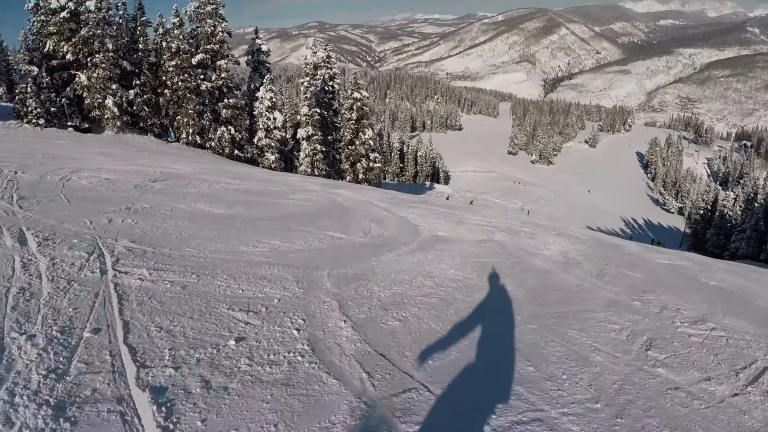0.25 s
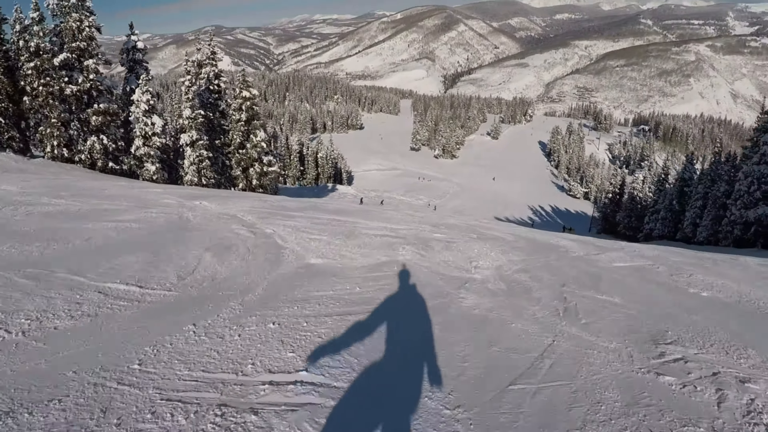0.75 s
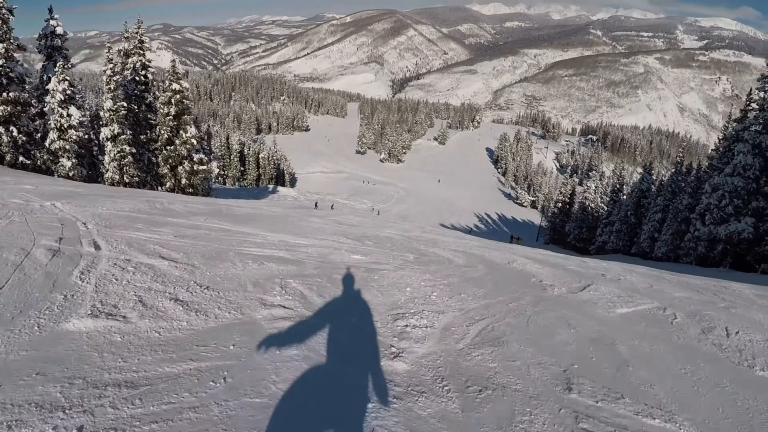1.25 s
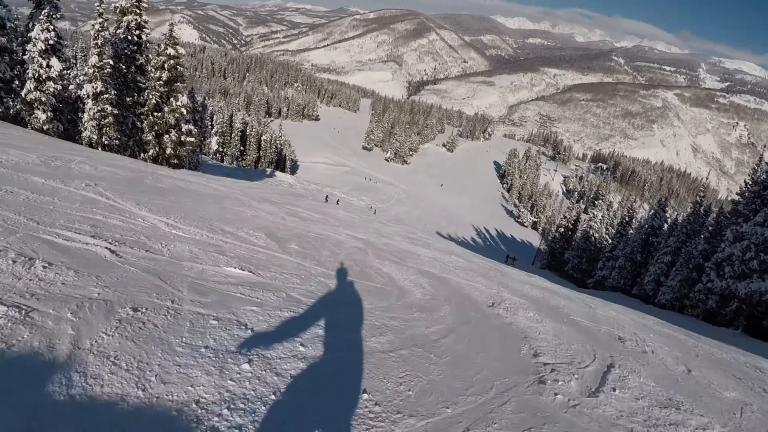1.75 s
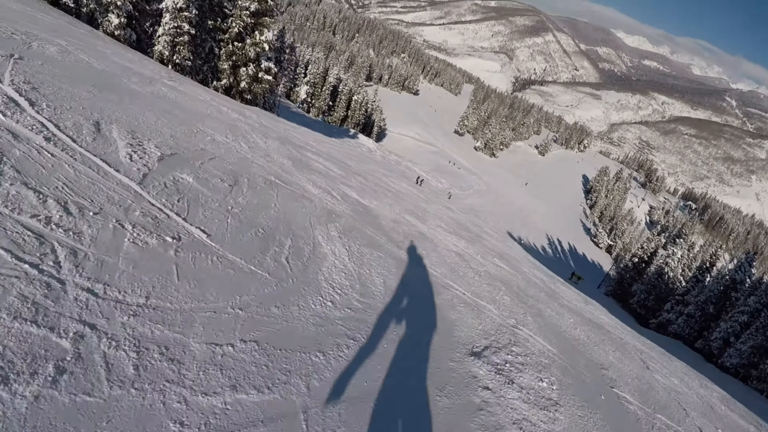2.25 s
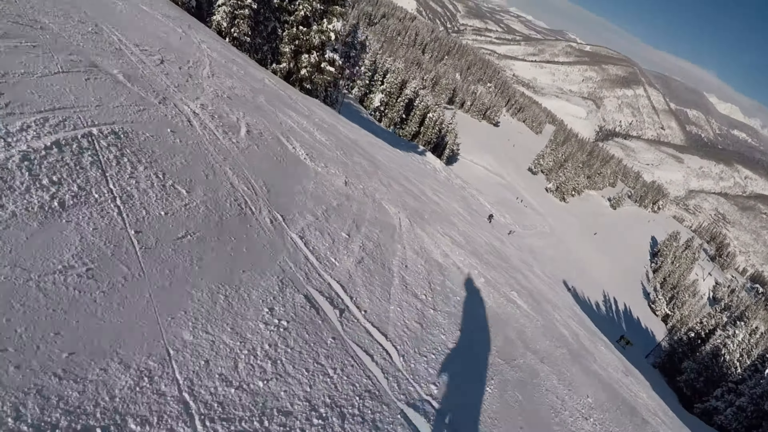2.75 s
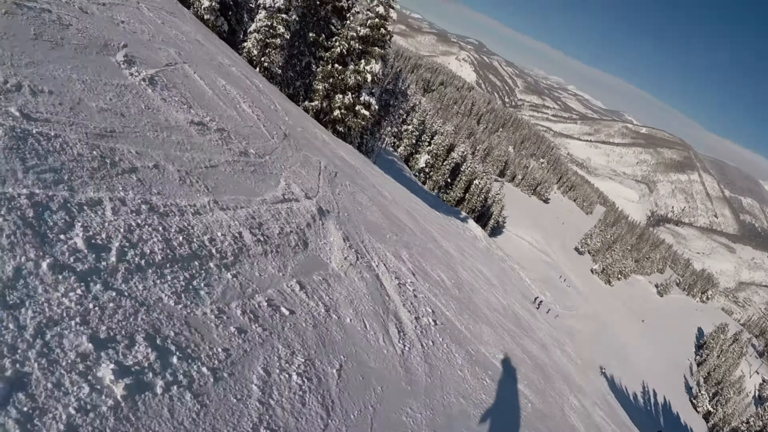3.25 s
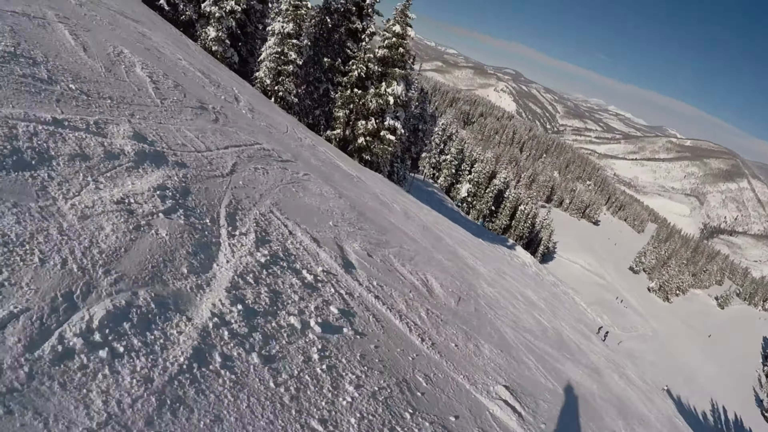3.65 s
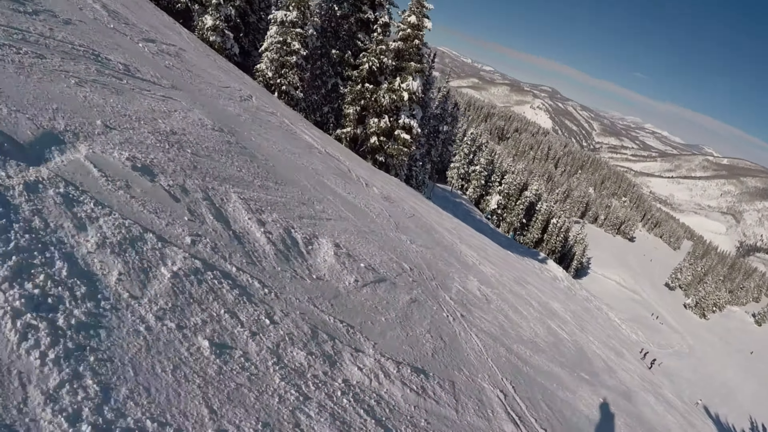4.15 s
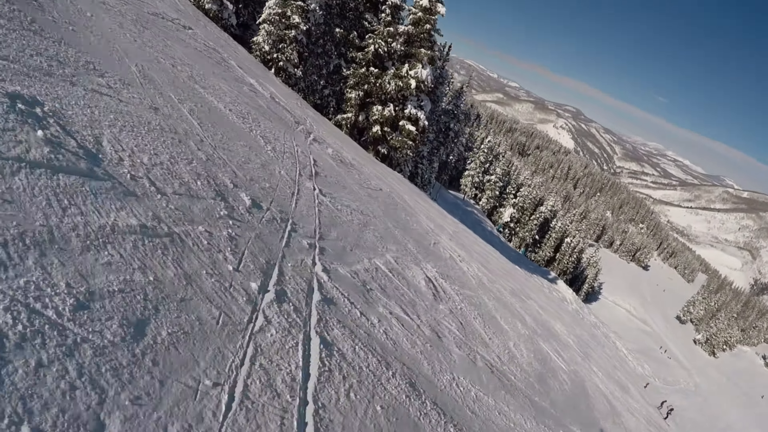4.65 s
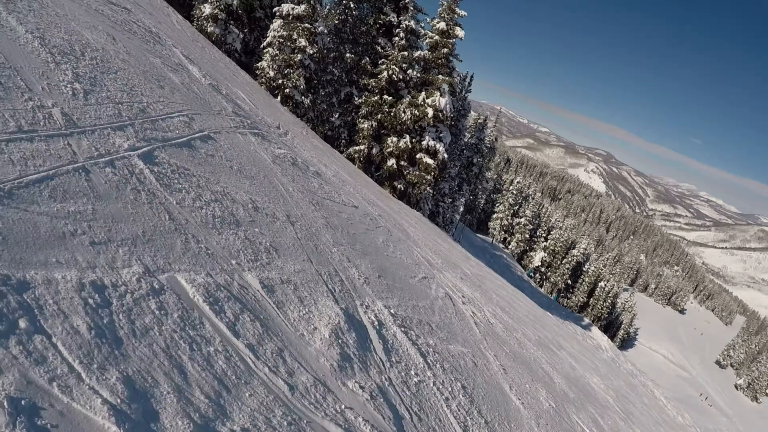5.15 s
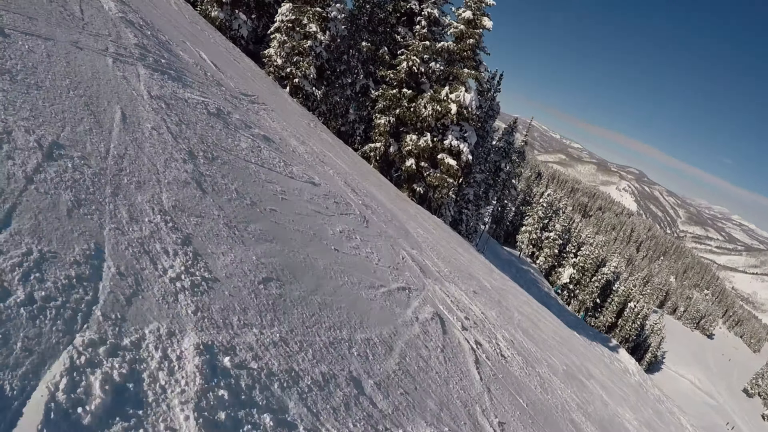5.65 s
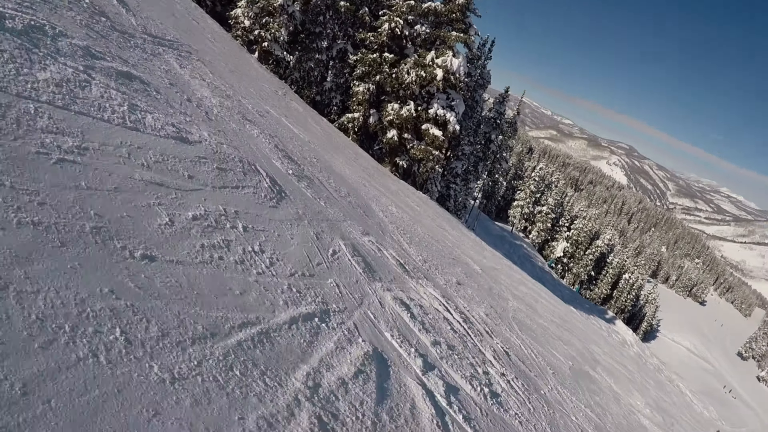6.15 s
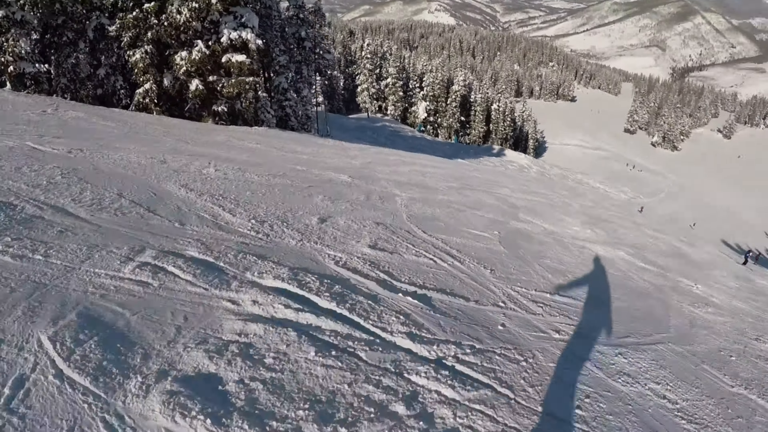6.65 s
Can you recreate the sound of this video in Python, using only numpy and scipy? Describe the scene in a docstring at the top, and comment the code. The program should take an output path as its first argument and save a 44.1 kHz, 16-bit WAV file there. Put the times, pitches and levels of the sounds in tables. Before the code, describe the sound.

Close on a snowboarder outdoors, a board scrapes and grinds over firm choppy snow. Wind gusts briefly, then a rough crunchy edge carve builds, eases to near quiet at about two seconds, and returns with heavy rut drumming and thuds. After four seconds it becomes a harsh, hissing skid with low booms, fading near the end. Low wind rumble continues. The snow sounds start wide, narrow nearly to mono, then widen again.

```python
"""On a slope of firm, chopped-up snow, a snowboard links turns, heard from a camera on the rider.
Wind noise is slow and fast pressure swings; loose snow patters as tiny random clicks.
Lumps knock, thud and crack as short noise bursts, and the loaded board booms at changing pitches.
Noise shaped by the load makes the ruts drum, the base grind and the edge scrape and hiss.
The snow sounds start wide, close almost to mono for the middle of the run, then open again."""
import sys
import numpy as np
from scipy import signal
from scipy.fft import rfft, irfft, next_fast_len
from scipy.io import wavfile
from scipy.ndimage import uniform_filter1d, map_coordinates

SR = 44100
rng = np.random.default_rng(int(sys.argv[2]) if len(sys.argv) > 2 else 0)


def generate_wav(sig):
    """Save sig (samples, or channels by samples) to the path in sys.argv[1] as 16-bit PCM at SR."""
    pcm = np.round(np.clip(np.atleast_2d(sig).T, -1, 1) * 32767).astype(np.int16)
    wavfile.write(sys.argv[1], SR, pcm)


N = 305172  # length in samples


def amp(db):
    """Turn decibels into gain."""
    return 10 ** (np.asarray(db) / 20)


def unit(x):
    """Scale to an rms of 1."""
    return x / np.sqrt(np.mean(x ** 2) + 1e-20)


def in_db(gains):
    """Joint level of unrelated sounds: their powers add."""
    return 10 * np.log10(sum(g ** 2 for g in gains) + 1e-20)


def along(points, hz):
    """Read (frequency [Hz], value) points on a log frequency axis."""
    f, v = np.transpose(points)
    return np.interp(np.log(hz + 1), np.log(f + 1), v)


def curves(rows):
    """Give one value per sample for each column after the time."""
    s, *columns = np.transpose(rows)
    return [np.interp(np.arange(N) / SR, s, column) for column in columns]


def ramp(middle, length):
    """Move steadily from 0 to 1 around a moment; both arguments are in seconds."""
    return np.clip((np.arange(N) / SR - middle) / length + .5, 0, 1)


def swell(start, held, attack, release):
    """Rise, hold and fall as a gain; attack and release are seconds per 20 dB."""
    t = np.arange(N) / SR - start
    rise = np.minimum(t, 0) / attack
    fall = np.maximum(t - held, 0) / release
    return amp(20 * (rise - fall))


def wobble(rate):
    """A smooth random curve at rms 1, made from rate random points a second."""
    points = rng.standard_normal(int(N * rate / SR) + 4)
    return unit(map_coordinates(points, [np.arange(N) * rate / SR]))


def filtered(x, response):
    """Multiply the spectrum of x by a response of frequency."""
    m = next_fast_len(N + SR // 4)
    return irfft(rfft(x, m) * response(np.fft.rfftfreq(m, 1 / SR)), m)[..., :N]


# resonances shared by all the coloured noises: (frequency [Hz], width [Hz], lift [dB])
RESONANCES = [(247, 68, 0.5), (497, 84, 1.5), (644.5, 71, 7.5), (753, 83, 2), (935, 160, 2),
              (1183, 120, 3.5), (1444, 210, 2), (2080, 130, 1), (2435, 120, 3), (3950, 640, 2.5),
              (4500, 250, 2)]


def coloured(x, spectrum):
    """Give x a spectrum plus the shared resonances, then scale it to rms 1."""
    def response(hz):
        lift = sum(db / (1 + (2 * (hz - centre) / width) ** 2) for centre, width, db in RESONANCES)
        return amp(along(spectrum, hz) + lift)
    return unit(filtered(x, response))


def blend(force, first, second, share):
    """Fade one force from a first to a second colour; the squared gains add up to 1."""
    share = np.clip(share, 0, 1)
    return np.sqrt(1 - share) * coloured(force, first) + np.sqrt(share) * coloured(force, second)


def fractures(rate, scatter_db, smooth):
    """Two streams of tiny breaks of random size, rate a second, over smooth sliding friction."""
    breaks = (rng.random((2, N)) < rate / SR) * rng.choice([-1, 1], (2, N))
    sizes = amp(scatter_db * np.clip(rng.standard_normal((2, N)), -2, 2))
    return unit(unit(breaks * sizes) + smooth * rng.standard_normal((2, N)))


# air pressing on the camera: (time [s], slow swell level [dB], flutter level before its wobble [dB])
AIR_PRESSURE = [(0, -51, -48.5), (.5, -53.5, -48.5), (1.6, -53.5, -54), (2.15, -56, -59), (2.6, -47, -55),
                (3.0, -49, -67), (3.3, -42.5, -50.5), (3.55, -50.5, -58), (3.75, -49.5, -57.5),
                (4.1, -52.5, -58), (4.48, -44, -54), (4.8, -55, -51), (5.25, -55, -67), (5.48, -58, -59),
                (5.68, -45.5, -71.5), (5.85, -54, -59.5), (6.08, -47.5, -56), (6.35, -58, -57.5),
                (6.92, -58.5, -54.5)]
# wind whirling across the microphone ports: (time [s], held [s], level before its wobble [dB])
GUSTS = [(0, 0.082, -48), (4.7, 2.2, -59), (6.08, 0.53, -49.5), (6.7, 0.22, -60)]
# wind howling in the housing: (time [s], held [s], level before its wobble [dB])
HOWLS = [(0.12, 0.25, -56), (6.3, 0.2, -64)]
GUST_ATTACK_S, GUST_RELEASE_S = 0.33, 0.42  # time to rise or fall by 20 dB
# colour of the slow swell: (frequency [Hz], relative level [dB])
RUMBLE_COLOUR = [(8, -5.5), (22, 4.5), (42, -0.5), (62, -10), (100, -27), (300, -72.5)]
# colour of the faster flutter: (frequency [Hz], relative level [dB])
FLUTTER_COLOUR = [(35, -9.5), (65, -3), (90, -1), (135, -1), (175, -7), (260, -15), (700, -70.5)]
# colour of the small eddies at the ports: (frequency [Hz], relative level [dB])
EDDY_COLOUR = [(20, 5), (100, 3.5), (300, 4), (560, 2), (900, -1), (1200, -10), (2000, -23.5), (4000, -51),
               (9000, -61)]
# colour of the howl: (frequency [Hz], relative level [dB])
HOWL_COLOUR = [(400, -26), (700, -7.5), (980, 0), (1250, -14), (2000, -23), (5000, -59)]


def wind():
    """Pressure swings reach both ports alike; eddies and howl push them against each other: (mid, side)."""
    swell_db, flutter_db = curves(AIR_PRESSURE)
    rumble = coloured(rng.standard_normal(N), RUMBLE_COLOUR) * amp(swell_db)
    flutter = coloured(rng.standard_normal(N), FLUTTER_COLOUR) * amp(flutter_db + 1.4 * wobble(7.1))
    gusts = [amp(db) * swell(s, held, GUST_ATTACK_S, GUST_RELEASE_S) for s, held, db in GUSTS]
    eddies = coloured(rng.standard_normal(N), EDDY_COLOUR) * amp(in_db(gusts))
    howls = [amp(db) * swell(s, held, GUST_ATTACK_S, GUST_RELEASE_S) for s, held, db in HOWLS]
    howl = coloured(rng.standard_normal(N), HOWL_COLOUR) * amp(in_db(howls))
    return np.array([rumble + flutter, (eddies + howl) * amp(1.9 * wobble(35))])


FULL_SCRAPE_DB = -50  # scrape level that counts as a full scrape
SPRAY_DB, SPRAY_GROWS = -92, 0.19  # patter level under a full scrape; dB of patter per dB of scrape
# the edge throws up loose snow: (time [s], held [s], level [dB])
THROWS = [(1.38, .1, -97), (3.11, 0.16, -87), (4.05, .04, -89), (4.25, .25, -91), (4.62, 0.078, -85),
          (5.03, 0.18, -93), (5.72, 0.21, -93)]
THROW_ATTACK_S, THROW_RELEASE_S = .2, .15  # time to rise or fall by 20 dB
# colour of the falling crystals: (frequency [Hz], relative level [dB])
POWDER_COLOUR = [(6000, -21), (8500, 6.5), (10500, 0), (12800, -2.5), (15000, -12.5)]


def spray(scrape_db):
    """Loose crystals patter louder the harder the edge scrapes, and in thrown sheets: (mid, side)."""
    patter = amp(SPRAY_DB + SPRAY_GROWS * (scrape_db - FULL_SCRAPE_DB))
    sheets = [amp(db) * swell(s, held, THROW_ATTACK_S, THROW_RELEASE_S) for s, held, db in THROWS]
    crystals = coloured(fractures(rate=1500, scatter_db=2.5, smooth=1.2), POWDER_COLOUR)
    return crystals * amp(in_db([patter] + sheets))


# lumps under the board, levels before the soft start and the doubling of knock and crack:
# (time [s], knock level [dB], thud level [dB], crack level [dB])
LUMPS = [(0.374, -48.5, -57, -65), (0.723, -51, -47, -49), (.761, -54, -45, -46.5), (.884, -57, -37, -62),
         (1.274, -54, -58, -51), (1.324, -52, -61, -47), (1.361, -52, -55, -55), (1.724, -55, -57, -64),
         (1.75, -61, -58, -52), (1.94, -48, -52, -61), (1.96, -49, -60, -71), (2.016, -50, -67, -52.5),
         (2.291, -75, -46, -75), (2.367, -48.5, -61, -68), (2.389, -52, -63, -71), (2.529, -53, -60, -58),
         (2.603, -66, -44, -76), (2.655, -54, -47, -63), (2.775, -52, -55, -76), (2.937, -55, -35, -56),
         (3.4, -54, -46, -67), (3.43, -47, -46, -67), (3.894, -47, -61, -76), (3.933, -58, -48, -62),
         (4.164, -56, -48, -53), (4.249, -43, -39, -63), (4.487, -53, -33, -55), (4.578, -50, -55, -51),
         (4.845, -59, -30.5, -62), (4.924, -61, -32, -56), (5.582, -60, -48, -63), (5.611, -54, -37, -55),
         (5.859, -50, -47, -51), (6.267, -47, -42.5, -55.5), (6.391, -52, -45, -69), (6.851, -52, -50, -65),
         (6.909, -51, -61, -57)]
KNOCK_ATTACK_S, THUD_ATTACK_S, CRACK_ATTACK_S = .0015, 0.0026, .0007  # time constants of the rise
# colour of a knock on the base: (frequency [Hz], relative level [dB])
KNOCK_COLOUR = [(150, -26), (600, 23), (1300, 7), (2200, -1), (3200, -14), (4500, -10), (6500, -13),
                (9000, -34), (15000, -52)]
# colour of the deck in thuds, and in drumming off the first edge: (frequency [Hz], relative level [dB])
DECK_OTHER = [(80, -26.5), (120, -7.5), (170, 1.5), (210, 0.5), (260, 3.5), (340, -0.5), (450, -9.5),
              (620, -17.5), (1200, -81)]
# colour of a lump cracking apart: (frequency [Hz], relative level [dB])
CRACK_COLOUR = [(400, -22), (1200, 3.5), (2200, 6), (3200, 5), (4400, 4.5), (6000, -14), (8000, -40),
                (14000, -46)]


def lumps(knock_t60=0.021, thud_t60=0.084, crack_t60=0.016):
    """Lumps knock on the base, thump the deck and crack; each t60 is seconds to fall 60 dB: (mid, side)."""
    knock, thud, crack = np.zeros((3, N + SR))
    t = np.arange(SR // 4) / SR

    def burst(db, t60, attack):
        return amp(db - 60 * t / t60) * (1 - np.exp(-t / attack))

    for s, knock_db, thud_db, crack_db in LUMPS:
        start = round(s * SR)
        knock[start:][:len(t)] += burst(knock_db, knock_t60, KNOCK_ATTACK_S)
        thud[start:][:len(t)] += burst(thud_db, thud_t60, THUD_ATTACK_S)
        crack[start:][:len(t)] += burst(crack_db, crack_t60, CRACK_ATTACK_S)
    force = rng.standard_normal((2, N))
    return (2 * knock[:N] * coloured(force, KNOCK_COLOUR)
            + thud[:N] * coloured(force, DECK_OTHER)
            + 2 * crack[:N] * coloured(force, CRACK_COLOUR))


# the loaded board flexes and booms: (time [s], held [s], pitch [Hz], level [dB])
BOOMS = [(.98, 0.053, 627, -48.5), (1.12, 0.098, 596, -49.5), (2.94, 0.13, 480, -47),
         (3.14, 0.087, 175, -47), (4.67, 0.21, 245, -43.5), (4.76, 0.082, 145, -48.5),
         (5.271, 0.091, 327, -51), (6.0, 0.068, 294, -52.5), (6.545, 0.022, 530, -55)]
BOOM_WIDTH, BOOM_ATTACK_S, BOOM_RELEASE_S = 0.4, .07, 0.14  # width per pitch; times per 20 dB


def booms():
    """Sliding friction drives one broad resonance of the bent board: (mid, side)."""
    sound = np.zeros((2, N))
    for s, held, pitch, db in BOOMS:
        body = lambda hz: 1 / (1 + (2 * (hz - pitch) / (BOOM_WIDTH * pitch)) ** 4)
        tone = unit(filtered(rng.standard_normal((2, N)), body))
        sound += tone * amp(db) * swell(s, held, BOOM_ATTACK_S, BOOM_RELEASE_S)
    return sound


def bites(rate, release, size=45):
    """The edge catches at random over size samples, eases off with time constant release [s], and saturates."""
    catches = (rng.random(N) < rate / SR) * rng.uniform(0.62, 1, N)
    load = signal.lfilter(np.hanning(size), [1, -np.exp(-1 / (release * SR))], catches)
    # the crust bears only so much load
    return unit(np.tanh(unit(load - load.mean()) / 2))


PATCH_DB, PATCH_HZ, PATCH_S = 2, 260, .035  # depth, width and length of a patch's colour


def patchy(x):
    """The colour shifts at random from one patch of snow to the next."""
    hz, t, z = signal.stft(x, SR, nperseg=512)
    field = rng.standard_normal(z.shape[1:])
    field = uniform_filter1d(field, max(1, round(PATCH_HZ / hz[1])), axis=0)
    field = uniform_filter1d(field, max(1, round(PATCH_S / t[1])), axis=1)
    return unit(signal.istft(z * amp(PATCH_DB * unit(field)), nperseg=512)[1][:, :N])


# how hard the ruts drum on the deck: (time [s], level before uneven grip [dB])
RUTS = [(0, -55.5), (.9, -48), (1.2, -49.5), (1.55, -57), (1.98, -64), (2.1, -81), (2.22, -76),
        (2.36, -62.5), (2.6, -53.5), (2.87, -47.5), (2.97, -40), (3.14, -37), (3.37, -50), (3.6, -53),
        (3.95, -53), (4.47, -41.5), (4.56, -46), (4.65, -39.5), (4.83, -41), (5.17, -49), (5.33, -44),
        (5.53, -57.5), (5.63, -48.5), (5.82, -48), (6.05, -44), (6.32, -55.5), (6.92, -60.5)]
# the flat base gliding, before dips and uneven grip: (time [s], scrape level [dB], hiss level [dB])
GLIDE = [(0, -67.5, -74.5), (.6, -73.5, -67.5), (2.12, -83.5, -77), (2.85, -66.5, -74.5), (3.6, -77.5, -77),
         (4.2, -65.5, -66.5), (5.5, -77, -75.5), (6.2, -65, -68.5), (6.4, -65.5, -73), (6.6, -68.5, -78),
         (6.92, -62.5, -71)]
# the edge pushing into the snow, before dips and uneven grip:
# (time [s], held [s], scrape level [dB], base grinding level [dB], crystal hiss level [dB])
PUSHES = [(.085, 0.049, -69, -60.5, -72.5), (.27, 0.13, -68.5, -81, -75), (.44, 0.026, -63, -64, -78),
          (.54, 0.11, -63, -55, -68.5), (0.728, 0.059, -52.5, -56.5, -57.5),
          (0.816, 0.086, -50, -50.5, -57.5), (.96, 0.066, -52.5, -49.5, -59), (1.08, 0.21, -56, -49, -60.5),
          (1.335, 0.058, -51, -50, -57.5), (1.41, 0.072, -51, -48.5, -56), (1.55, 0.16, -59, -54, -61.5),
          (1.745, 0.053, -56, -60.5, -61), (1.86, 0.17, -62.5, -59.5, -68), (2.1, 0.1, -77, -86, -78),
          (2.235, 0.076, -71.5, -85, -73), (2.37, 0.044, -67.5, -83, -91), (2.515, 0.014, -67, -66, -71.5),
          (2.64, 0.012, -68, -60, -78), (2.925, 0.016, -58.5, -65, -67.5), (2.988, 0.11, -52.5, -60, -59),
          (3.129, 0.12, -51, -48.5, -56.5), (3.45, 0.02, -62, -58, -69.5), (3.76, 0.015, -62.5, -60.5, -65),
          (3.96, 0.028, -70, -74, -66), (4.03, 0.042, -56, -55, -57.5), (4.16, 0.01, -59, -67, -63),
          (4.23, 0.07, -55, -57.5, -61), (4.35, 0.14, -50, -55, -58.5), (4.613, 0.11, -49.5, -64, -56.5),
          (4.78, 0.11, -54, -57, -60.5), (4.97, 0.18, -57, -57, -60.5), (5.18, .12, -55, -56, -58),
          (5.36, 0.019, -63, -61, -74), (5.598, 0.055, -57.5, -57.5, -62), (5.715, 0.071, -57, -55, -58),
          (5.869, 0.14, -52, -53.5, -54), (6.05, 0.045, -55.5, -55.5, -60.5), (6.15, 0.02, -62, -57, -65),
          (6.49, 0.048, -64.5, -56, -65.5), (6.625, 0.0088, -58.5, -61, -63), (6.725, 0.064, -68, -80, -65)]
PUSH_ATTACK_S, PUSH_RELEASE_S = .075, 0.14  # time to rise or fall by 20 dB
# short dips in the grind, scrape and hiss level, many just before a push:
# (time [s], length [s], drop, negative is a rise [dB])
DIPS = [(1.696, 0.072, 10), (2.065, .07, 2), (2.604, 0.036, 4), (2.687, 0.059, 2), (2.877, 0.068, -0.5),
        (2.958, 0.025, 3.5), (3.365, 0.048, 1.5), (3.92, .04, 3), (4.567, 0.024, 0.5), (5.576, 0.047, 5),
        (6.44, 0.046, 1), (6.577, 0.043, 0), (6.68, 0.034, 3)]
GLIDE_GRIND_DB, RUT_GRIND_DB = 5.5, -16.5  # grinding relative to the glide's scrape and to the drumming


def contact():
    """Levels of drum, grind, scrape and hiss: pushes add to the glide; all but the drum dip briefly."""
    drum_db, = curves(RUTS)
    glide_db, glide_hiss_db = curves(GLIDE)
    scrape, hiss = [amp(glide_db)], [amp(glide_hiss_db)]
    grind = [amp(glide_db + GLIDE_GRIND_DB), amp(drum_db + RUT_GRIND_DB)]
    for s, held, scrape_db, grind_db, hiss_db in PUSHES:
        push = swell(s, held, PUSH_ATTACK_S, PUSH_RELEASE_S)
        scrape.append(push * amp(scrape_db))
        grind.append(push * amp(grind_db))
        hiss.append(push * amp(hiss_db))
    t = np.arange(N) / SR
    dip_db = sum(db * np.exp(-(2 * (t - s) / length) ** 4) for s, length, db in DIPS)
    return drum_db, in_db(grind) - dip_db, in_db(scrape) - dip_db, in_db(hiss) - dip_db


# the rider rolls onto the first edge, then back: (middle time [s], length [s])
EDGE_CHANGES = [(.3, 0.93), (2.25, 0.42)]
SKID_S, SKID_ONSET_S = 4.54, 0.62  # the clean carve breaks into a sideways drift: middle, length
LOOSE_GROWS = 0.04  # a lightly loaded edge catches less evenly: added share per dB below a full scrape
SLIDE_DB = -77  # the even whisper of the base, always on the snow
# deck colour on the first edge: (frequency [Hz], relative level [dB])
DECK_FIRST = [(80, -28), (130, 3.5), (170, 3.5), (230, 0), (310, 1.5), (420, -20), (600, -54), (1200, -68)]
# base colour on the first edge: (frequency [Hz], relative level [dB])
BASE_FIRST = [(200, -30), (340, 1.5), (470, -2.5), (590, -5), (730, -6.5), (830, -18.5), (1100, -33),
              (3000, -77)]
# base colour on the other edge: (frequency [Hz], relative level [dB])
BASE_OTHER = [(200, -30.5), (340, -3.5), (500, -1), (600, -4), (730, -6), (850, -6.5), (1200, -26),
              (3000, -85)]
# scrape colour of the first edge: (frequency [Hz], relative level [dB])
SCRAPE_FIRST = [(450, -26), (850, 1.5), (1250, -1.5), (1700, 1.5), (2050, 3), (2400, -4), (2800, -6),
                (3400, -13), (5000, -21.5), (9000, -87)]
# scrape colour of the other edge: (frequency [Hz], relative level [dB])
SCRAPE_OTHER = [(450, -19.5), (800, 1.5), (1250, 2), (1650, -2), (2300, -4.5), (2900, -11), (3500, -22),
                (5000, -42), (9000, -78)]
# colour of crystals sheared in a clean carve: (frequency [Hz], relative level [dB])
HISS_CARVE = [(1500, -30.5), (3200, -9), (3950, -2.5), (4550, -1), (5300, -8), (6600, -16.5), (8000, -28.5),
              (10000, -40.5), (13000, -61)]
# colour of crystals sheared in a sideways drift: (frequency [Hz], relative level [dB])
HISS_SKID = [(1500, -21), (2600, -0.5), (3400, 0), (4450, -1.5), (5200, -6), (6600, -13), (7500, -21),
             (8300, -36), (12000, -48)]


def board(drum_db, grind_db, scrape_db, hiss_db):
    """Ruts drum on the deck, the base grinds, the edge breaks crust and shears crystals: (mid, side)."""
    edge = 1 - ramp(*EDGE_CHANGES[0]) + ramp(*EDGE_CHANGES[1])  # 0 is the first edge, 1 the other
    skid = ramp(SKID_S, SKID_ONSET_S)
    # uneven grip shakes these four sounds together
    loose = 1 + LOOSE_GROWS * np.clip(FULL_SCRAPE_DB - scrape_db, 0, 20)
    grip = loose * (bites(rate=280, release=0.0037) + .5 * wobble(36))
    drum = blend(fractures(rate=900, scatter_db=1.5, smooth=0.64), DECK_FIRST, DECK_OTHER, edge)
    grind = blend(fractures(rate=830, scatter_db=0.0, smooth=0.6), BASE_FIRST, BASE_OTHER, edge)
    # scrape and hiss each meet their own patches of snow
    crust = patchy(fractures(rate=2800, scatter_db=3.0, smooth=0.79))
    scrape = blend(crust, SCRAPE_FIRST, SCRAPE_OTHER, edge)
    crystals = patchy(fractures(rate=2800, scatter_db=1.5, smooth=0.93))
    hiss = blend(crystals, HISS_CARVE, HISS_SKID, skid)
    whisper = coloured(rng.standard_normal((2, N)), SCRAPE_FIRST) * amp(SLIDE_DB)
    return (drum * amp(drum_db + 0.78 * grip)
            + grind * amp(grind_db + 0.5 * grip)
            + scrape * amp(scrape_db + 0.68 * grip)
            + hiss * amp(hiss_db + 0.76 * grip + 0.56 * wobble(40))
            + whisper)


# stereo spread of the snow: (frequency [Hz], side level before the 7.5 dB cut and the width gain [dB])
SPREAD = [(100, -33), (300, -40), (600, -28.5), (1200, 2.5), (2200, 2), (4200, 3.5), (8000, 9.5),
          (13000, 11)]
# leaning of the snow: (frequency [Hz], left minus right before the width gain [dB])
LEAN = [(500, 0), (900, -6.5), (1460, -16), (2500, -8), (4200, -4.5), (7200, 0.5)]
NARROW_S, WIDEN_S = (0.33, 0.76), (4.51, 0.55)  # the image closes and opens: (middle, length)
WIDE_DB, NARROW_DB = -4, -26.5  # side gain of the snow sounds


def scene():
    """Snow sounds, leaning to the right while the image is wide, join the wind: (left, right)."""
    drum_db, grind_db, scrape_db, hiss_db = contact()
    mid, side = board(drum_db, grind_db, scrape_db, hiss_db) + spray(scrape_db) + lumps() + booms()
    side = filtered(side, lambda hz: amp(along(SPREAD, hz) - 7.5))

    def lean_response(hz):
        left_to_right = amp(along(LEAN, hz))
        return (left_to_right - 1) / (left_to_right + 1)

    lean = filtered(mid, lean_response)
    narrow = ramp(*NARROW_S) - ramp(*WIDEN_S)
    width_db = WIDE_DB + (NARROW_DB - WIDE_DB) * narrow
    mid, side = np.array([mid, (side + lean) * amp(width_db)]) + wind()
    return np.array([mid + side, mid - side])


TOP_HZ = 15100  # band limit of the camera


def record(dry):
    """The camera keeps nothing above its band limit."""
    return filtered(dry, lambda hz: hz < TOP_HZ)


dry = scene()
out = record(dry)
generate_wav(out)
```